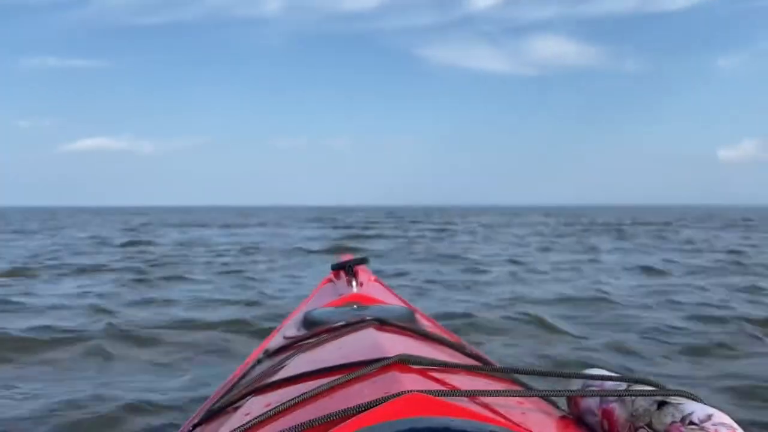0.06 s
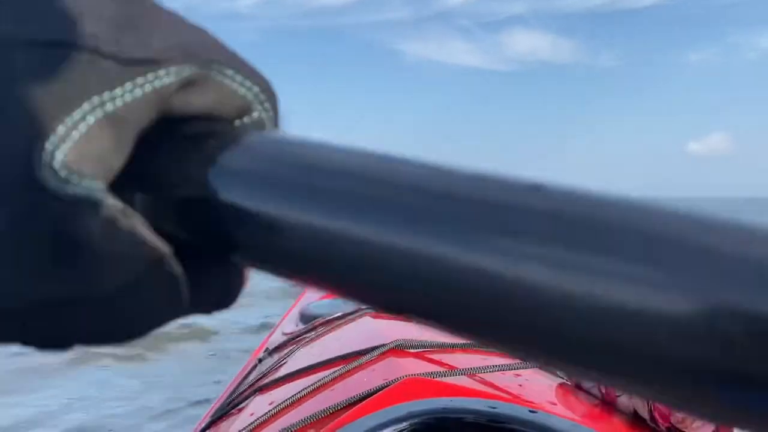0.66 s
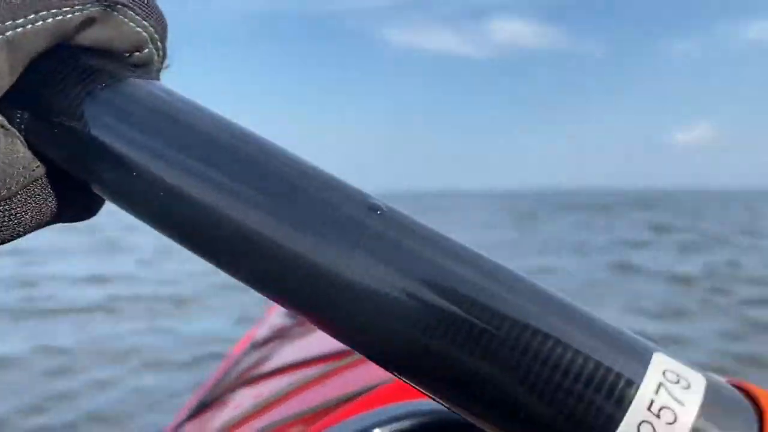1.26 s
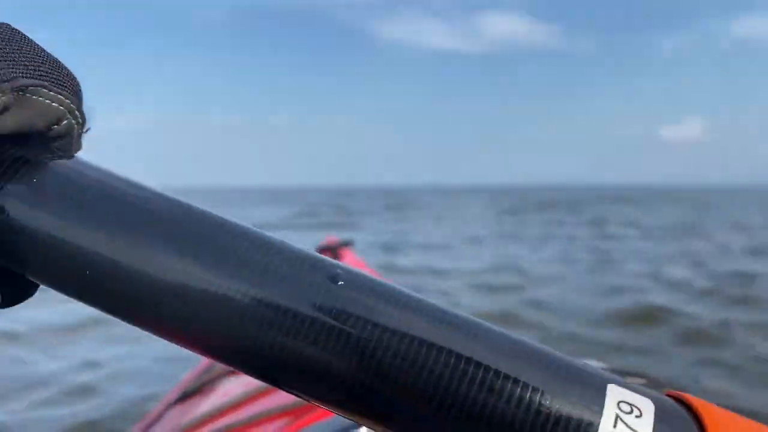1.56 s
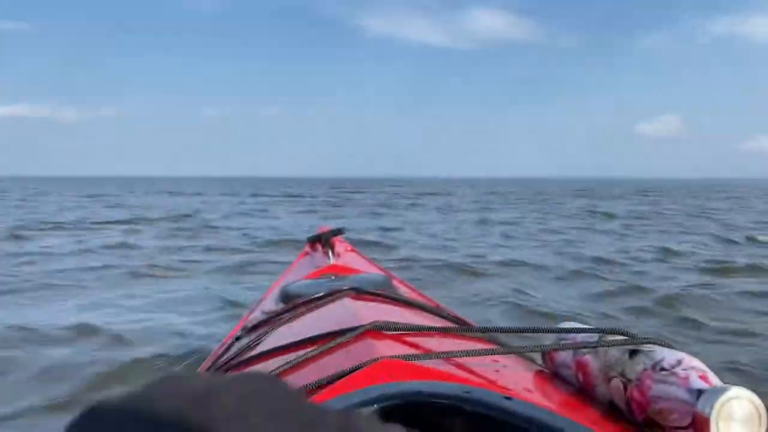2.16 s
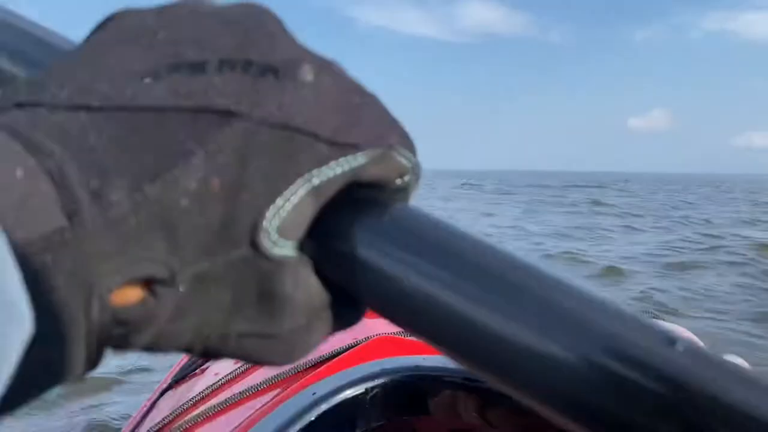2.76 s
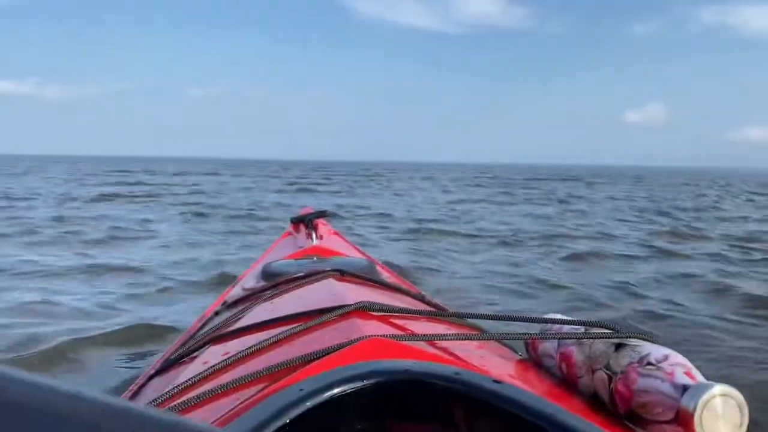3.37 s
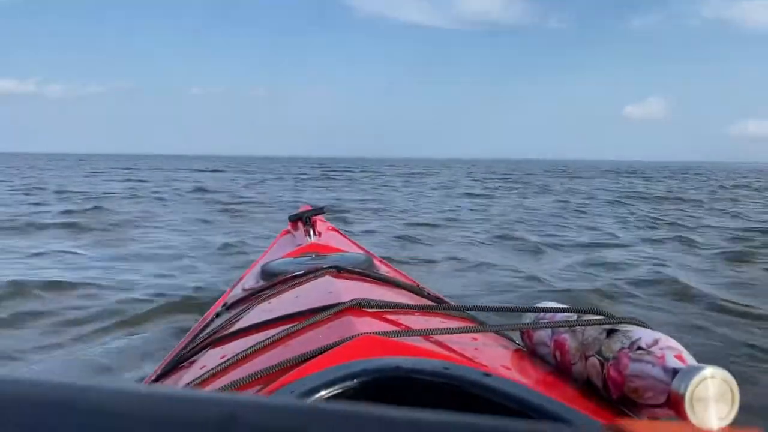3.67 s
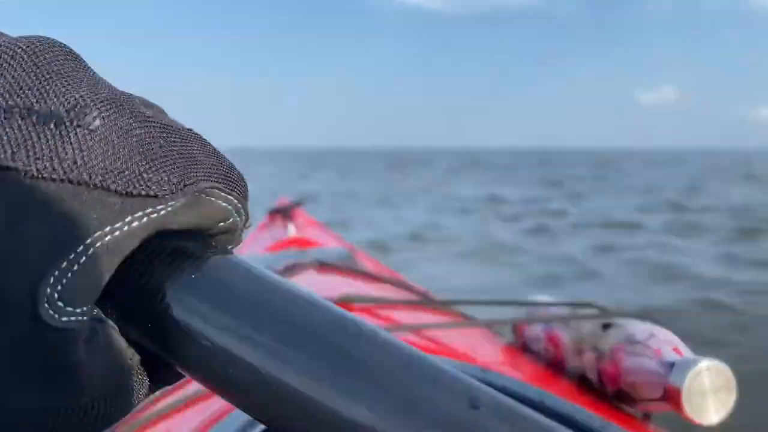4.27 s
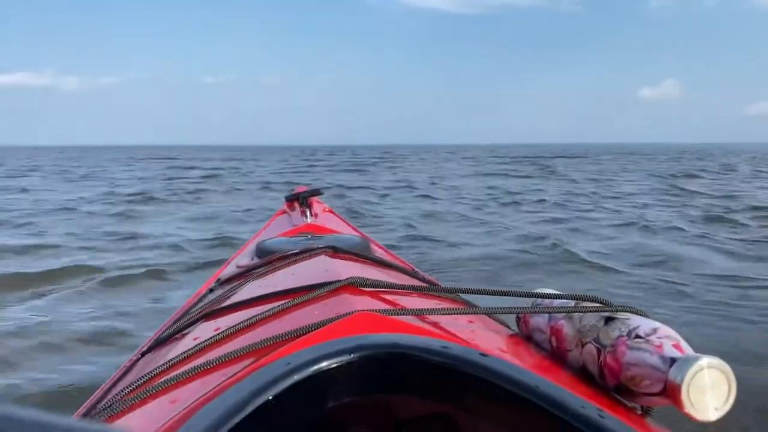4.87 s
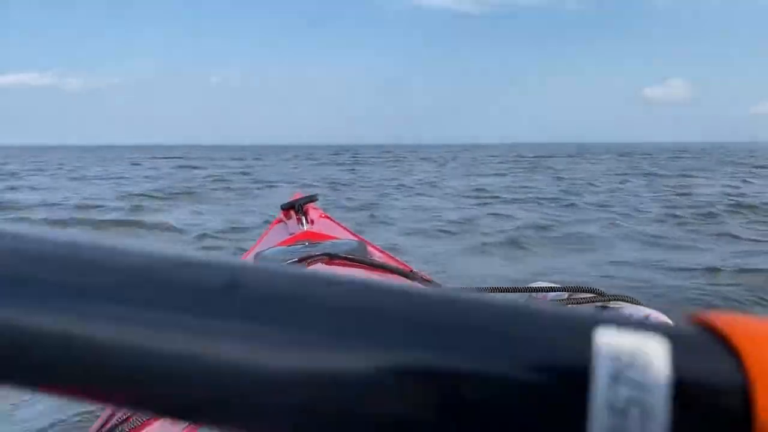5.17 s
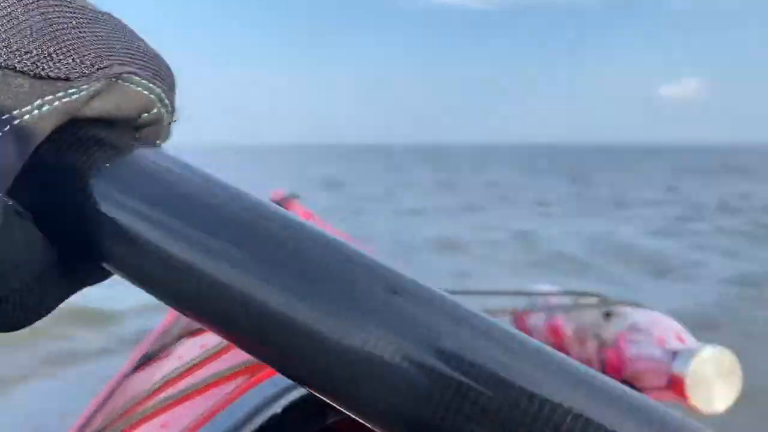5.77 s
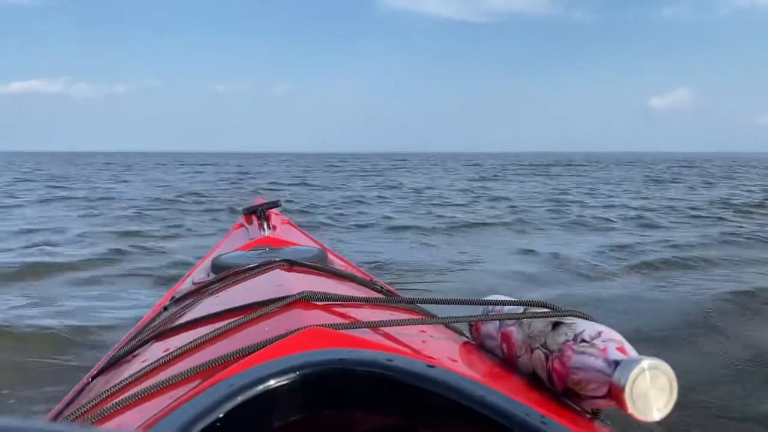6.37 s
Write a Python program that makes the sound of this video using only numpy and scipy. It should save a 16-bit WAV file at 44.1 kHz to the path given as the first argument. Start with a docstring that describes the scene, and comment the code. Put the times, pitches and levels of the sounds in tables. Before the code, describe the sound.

Wind rumbles and flutters directly on the microphone for the whole six and a half seconds, broken by sudden dull buffets. The hardest hit at about 0.8, 1.7, 3.8, 5.7 and 6 seconds. Under the wind, a kayak paddle pulls through the water close by, at the very start and near 1.4, 3.1, 4.6 and 6 seconds. Each stroke is a bubbly, splashing wash that holds for up to half a second and fizzes out. Between strokes, wavelets lap along the hull, and small, sharp slaps of water are scattered throughout, the clearest near 4.4 seconds. Drips plink into the water, with one lower, louder plink around 3.4 seconds, and a few drops tick on the hard deck, mostly between 3 and 4 seconds. Behind everything lies the faint, even hiss of choppy open water.

```python
"""Wind rumbles and flutters on the microphone, with sharp buffets, each in a swirl of rough air.
The place is a kayak on choppy open water; the two microphone ports sit on the paddler's chest.
Close by, a paddle stroke about every second and a half stirs up a wash of bubbles. Wavelets lap and slap
the hull, and drips plink into the water and tick on the deck. Farther off, the chop is an even hiss."""
import sys
import numpy as np
from scipy import signal
from scipy.fft import rfft, irfft
from scipy.io import wavfile

SR = 44100
rng = np.random.default_rng(int(sys.argv[2]) if len(sys.argv) > 2 else 0)


def wav_out(sig):
    """Save sig, one row per channel (or a flat mono array), as 16-bit PCM at SR to the path in sys.argv[1]."""
    wavfile.write(sys.argv[1], SR, np.round(np.clip(np.atleast_2d(sig).T, -1, 1) * 32767).astype(np.int16))


N = 287794
TIME, FREQ = np.arange(N) / SR, np.fft.rfftfreq(N, 1 / SR) + 1e-3

# Single strong eddies that hit the ports. Each row: time in seconds, level in dB, centre in Hz,
# width in natural-log units of frequency (a wide one is a hard crack).
STRONG_EDDIES = [(0.424, -13, 59.4, 0.51), (0.521, -13, 335, 0.76), (0.533, -10, 360, 0.58),
                 (0.611, -12, 323, .65), (0.722, -15.5, 374, 0.54), (0.8042, -8, 425, 0.65),
                 (1.298, -18, 80, 0.63), (1.5151, -12, 412, 0.48), (1.544, -12, 338, 0.77),
                 (1.59, -14, 256, 0.6), (1.7022, -6, 354, .85), (1.841, -13, 189, 0.7),
                 (1.988, -11, 225, 0.53), (2.176, -9, 334, 0.53), (2.315, -15.5, 442, 0.52),
                 (2.477, -10.5, 80, .55), (2.494, -10, 116, 0.35), (2.497, -10.5, 382, 0.44),
                 (2.845, -15, 324, 0.53), (2.877, -13.5, 524, 0.44), (2.922, -10.5, 74, 0.84),
                 (3.164, -12.5, 253, 0.37), (3.262, -13.5, 320, 0.58), (3.276, -15, 335, 0.45),
                 (3.689, -14, 397, .75), (3.698, -8, 156, 0.45), (3.746, -26, 330, 0.41),
                 (3.8027, -13.5, 470, 0.56), (3.812, -16.5, 470, 0.72), (3.832, -6.5, 185, 0.71),
                 (3.972, -15.5, 260, 0.5), (4.181, -18, 410, 0.45), (4.273, -17, 263, 0.67),
                 (4.398, -14.5, 193, 0.71), (4.514, -17, 467, 0.45), (4.581, -13, 272, 0.64),
                 (4.802, -12.5, 410, 0.68), (4.809, -12.5, 82.5, 0.51), (4.815, -14, 398, 0.68),
                 (5.198, -14, 107, 0.58), (5.353, -16.5, 251, 0.6), (5.539, -12, 312, 0.49),
                 (5.611, -10, 200, 0.49), (5.640, -9.5, 333, 0.55), (5.6546, -4.5, 283, 0.73),
                 (5.712, -11, 94, 0.61), (5.7383, -5, 335, 0.6), (5.799, -11.5, 470, 0.59),
                 (5.821, -9.5, 427, 0.59), (5.83, -11, 64.5, 0.57), (6.013, -14.5, 450, 0.54),
                 (6.014, -6, 114, 0.49), (6.3173, -13, 350, 0.53), (6.323, -12, 150, 0.7),
                 (6.4219, -8, 480, 0.55)]
# The colour of splashing water. Each row: frequency in Hz, gain in dB.
SPLASH_COLOUR = [(150, -1), (400, 13), (1200, 18), (2000, 4.5), (2800, 2.5), (4200, -0.5), (5300, -4),
                 (6600, -10.5), (8500, -9), (10300, -13.5), (12200, -30.5), (15000, -12)]


def wind(level_db=-1.5, flutter_db=7, flutter_db_per_octave=1.45, lag_cycles=0.5736, swirl_low_hz=60):
    """Turbulence right on the microphone: small eddies come in bursts and grow fastest with a gust."""
    # The wind's strength at the ports. Each row: time in seconds, level in dB.
    strength = [(0.0, -29.5), (0.27, -31.5), (0.57, -21.5), (0.93, -28), (0.96, -23.0), (1.17, -30.5),
                (1.38, -30.5), (1.53, -20.5), (1.65, -24.5), (2.39, -21), (2.72, -27.5), (3.35, -27),
                (3.53, -33.0), (3.68, -18.5), (4.04, -21.5), (4.1, -33), (4.25, -21), (4.34, -36),
                (4.52, -28), (4.76, -25.5), (4.82, -17.5), (5.03, -32), (5.21, -23.5), (5.27, -41),
                (5.33, -24.5), (5.48, -29), (5.66, -20.5), (5.69, -35.5), (5.81, -28), (5.96, -28.5),
                (6.08, -20.5), (6.11, -36.5), (6.17, -23), (6.26, -44.5), (6.41, -22), (6.53, -26)]
    # The wind's share in each half octave. Each row: frequency in Hz, relative level in dB.
    band_levels = [(32, -37), (45, -11.5), (65, -4), (130, -8), (260, -8.5), (500, -10.5), (720, -16),
                   (1000, -25.5), (1400, -35), (2000, -49.5)]
    breeze_db = curve(strength)
    gust_db = breeze_db - breeze_db.mean()
    bursts = wander(rate_hz=35)
    spectrum = np.zeros((2, len(FREQ)), complex)
    for hz in 32 * 2 ** (np.arange(13) / 2):
        follow = 0.34 + 0.33 * max(np.log2(hz / 100), 0)
        swell = amp(level_db + read(band_levels, hz) + breeze_db.mean() + follow * gust_db)
        flutter = 2 * np.tanh((0.69 * bursts + 0.5 * wander(rate_hz=20)) / 2)
        depth_db = max(flutter_db + flutter_db_per_octave * np.log2(hz / 400), 0)
        air = pair(rng.standard_normal((2, N)), likeness=0.6) * amp(depth_db * flutter)
        band = np.cos(np.pi / 2 * np.clip(2 * np.log2(FREQ / hz), -1, 1))
        trail = np.exp(-2j * np.pi * lag_cycles * np.log(FREQ))  # large eddies trail small ones
        eddies = unit(shaped(air, band * trail))
        power = swell ** 2 + swirl_power(hz) / (1 + (swirl_low_hz / hz) ** 6)
        spectrum += rfft(eddies * np.sqrt(power))
    return irfft(spectrum, N)


def buffets(lag_cycles=0.79, skew_rad=0.74, wake=0.28, wake_s=0.00311, high_hz=1600, low_hz=42):
    """An eddy hits the ports as a pressure swing that falls in pitch: a crack, then a thump."""
    size = 8192
    f, out = np.fft.rfftfreq(size, 1 / SR) + 1e-3, np.zeros((2, N))
    for s, db, hz, width in STRONG_EDDIES:
        turn, slant, wait = 2 * rng.random(3) - 1
        log_ratio = np.log(f / hz)
        swing = np.exp(-0.5 * (log_ratio / width) ** 2 - 2j * np.pi * lag_cycles * log_ratio)
        swing *= 1 + wake * np.exp(-2j * np.pi * f * wake_s * 2 ** (wait / 2))  # a weaker eddy follows
        ports = np.exp(1j * (np.pi * turn + skew_rad * slant * np.array([[1], [-1]])))
        wave = np.fft.fftshift(irfft(swing * ports), axes=1)
        add(out, s - size / 2 / SR, wave * amp(db) / abs(wave).max())
    overloaded = np.tanh(out)  # the hardest buffets overload softly, gaining harmonics that the ports then cut above the treble
    return shaped(overloaded, 1 / np.sqrt(1 + (FREQ / high_hz) ** 7 + (low_hz / FREQ) ** 10))


def swirl_power(hz, level_db=-23.5, lag_s=0.018, width_s=0.012, octaves_below=0.69):
    """Power around hz of the larger eddies a buffet leaves, just behind it and lower in pitch."""
    s, db, centre_hz, _ = np.transpose(STRONG_EDDIES)
    t = TIME[::100]
    share = amp(db + level_db) ** 2 * np.exp(-(np.log2(hz / centre_hz) + octaves_below) ** 2)
    swells = np.exp(-((t - s[:, None] - lag_s) / width_s) ** 2)
    return np.interp(TIME, t, share @ swells)


def wash(level_db=-2.5, bubbles_per_s=3000, size_db=4.5, spray_db=1, clump_db=2):
    """Beside the boat, stirred water breeds bubbles of like size in spurts, under a fine spray."""
    swarm, pitches = np.zeros((2, N)), 60
    births = int(bubbles_per_s * N / SR / pitches)
    for register in np.geomspace(500, 15000, pitches).reshape(6, -1):
        spurts = np.sqrt(0.53 + patter(per_s=70, decay_s=0.011) ** 2)
        for k, hz in enumerate(register):
            clicks = np.zeros(N)
            clicks[rng.integers(0, N, births)] = amp(size_db * np.minimum(rng.exponential(1, births), 4))
            cycles = rng.uniform(3, 9) * (hz / 2000) ** (1 / 3)
            ring = bubble(hz, cycles, rise=rng.uniform(-0.003, 0.006))
            swarm[k % 2] += unit(signal.oaconvolve(clicks * spurts, ring)[:N]) * np.sqrt(hz)
    swarm = np.array([swarm[0] + swarm[1], swarm[0] - swarm[1]])  # bubbles lie a little to either side
    spray = rng.standard_normal((2, N)) * patter(per_s=1400, decay_s=0.0026)
    spray *= np.sqrt(1.4 + patter(per_s=90, decay_s=0.0037) ** 2)
    spray = unit(shaped(spray, FREQ / (FREQ + 2500)))
    water = (unit(swarm) + amp(spray_db) * spray) * amp(clump_db * wander(rate_hz=4.8))
    water = shaped(water, amp(read(SPLASH_COLOUR, FREQ)))
    water /= np.std(shaped(water, FREQ > 2500))  # the treble sets the level
    return from_water(water, likeness=0.75) * amp(level_db) * stirring()


def stirring(bite_s=0.11, fizz_out_db_per_s=51):
    """How hard the water is stirred: a stroke bites, holds and fizzes out; a wavelet swells and sinks."""
    # Paddle strokes. Each row: blade entry in seconds, length of the pull in seconds, level in dB.
    pulls = [(-0.05, 0.41, -48), (1.371, 0.4, -47.5), (3.139, 0.53, -46.5), (4.551, 0.2, -45),
             (6.0, 0.44, -47)]
    # Wavelets lapping along the hull. Each row: crest in seconds, half length in seconds, level in dB.
    wavelets = [(0.747, 0.11, -70), (1.133, 0.21, -59.5), (1.97, 0.076, -52.5), (2.412, 0.055, -63.5),
                (2.66, 0.11, -58), (3.097, 0.1, -58.5), (4.39, 0.3, -54), (4.983, 0.043, -47),
                (5.238, 0.12, -54.5), (5.508, 0.06, -52.5), (5.719, 0.065, -51), (6, 0.083, -51.5)]
    swells = []
    for s, pull_s, db in pulls:
        bite = np.clip((TIME - s) / bite_s, 0, 1)
        swells.append(bite * amp(db - fizz_out_db_per_s * np.maximum(TIME - s - pull_s, 0)))
    swells += [amp(db) * np.exp(-0.5 * ((TIME - s) / half_s) ** 2) for s, half_s, db in wavelets]
    return np.linalg.norm(swells, axis=0)


def slaps(level_db=1, attack_s=0.00041, decay_s=0.012, grain_db=5, pocket_db=14, pocket_q=7):
    """A sheet of water breaks on hull or blade: a short, grainy burst that rings a pocket of air."""
    # Slaps and spits close by. Each row: start in seconds, level in dB, pitch of the air pocket in Hz.
    hits = [(0.113, -33, 4460), (0.2488, -32.5, 2400), (0.327, -29.5, 2420), (0.81, -43.5, 3200),
            (1.013, -48, 5830), (1.064, -46, 3550), (1.152, -44.5, 5900), (1.158, -33, 2450),
            (1.247, -37, 2850), (1.3783, -28, 2970), (1.4315, -35, 2340), (1.536, -35, 5430),
            (1.646, -31, 5150), (1.656, -28, 2480), (1.765, -30, 5050), (2.592, -34.5, 2450),
            (3.1738, -31.5, 3370), (3.2466, -32, 2390), (3.376, -35, 3530), (3.962, -34.5, 2920),
            (4.126, -31, 3350), (4.29, -31, 5500), (4.304, -28.5, 2440), (4.393, -20.5, 1890),
            (4.658, -43, 5300), (4.691, -33, 5160), (4.756, -35, 5150), (4.801, -27, 2130),
            (5.716, -39, 5300), (6.045, -25.5, 1890), (6.287, -29.5, 4500), (6.296, -29.5, 2600),
            (6.4205, -28.5, 2270)]
    t, out = np.arange(SR // 8) / SR, np.zeros((2, N))
    envelope = (1 - np.exp(-t / attack_s)) * np.exp(-t / decay_s)
    grains = rng.standard_normal((2, N)) * amp(grain_db * wander(rate_hz=290))
    grains = unit(shaped(grains, amp(read(SPLASH_COLOUR, FREQ))))
    for s, db, hz in hits:
        burst = grains[:, round(s * SR):][:, :len(t)]
        burst = burst * envelope[:burst.shape[1]]
        pocket = amp(pocket_db) * signal.lfilter(*signal.iirpeak(hz, pocket_q, SR), burst)
        slap = signal.lfilter(*signal.butter(2, hz / 2, "high", fs=SR), burst + pocket)
        add(out, s, slap * amp(db + level_db) / abs(slap).max())
    return from_water(out, likeness=0.53)


def drips(cycles=10, rise=0.004, split_db=-7, split_within_s=0.00272):
    """Drips off the blade trap large bubbles that plink; a smaller one splits off just after."""
    # Ringing bubbles. Each row: start in seconds, level in dB, pitch in Hz.
    plinks = [(1.002, -36, 2320), (1.088, -35, 2540), (1.203, -42, 2280), (1.478, -28, 2800),
              (1.494, -29.5, 5350), (1.775, -30, 5220), (2.064, -38.5, 3170), (2.137, -39, 1750),
              (3.074, -44, 2500), (3.093, -40.5, 2400), (3.381, -27, 3180), (3.412, -17.5, 1074),
              (3.421, -27, 1240), (4.402, -33, 1930), (4.587, -26.5, 2120), (4.724, -28, 1990),
              (6.033, -28.5, 1920), (6.273, -32, 2050)]
    out = np.zeros((2, N))
    for s, db, hz in plinks:
        wait, smaller = rng.random(2)
        add(out[0], s, amp(db) * bubble(hz, cycles, rise))
        small_bubble = bubble(hz * (1 + 0.6 * smaller), cycles / 2, rise)
        add(out[0], s + split_within_s * wait, amp(db + split_db) * small_bubble)
    return from_water(out, likeness=0.89)


def deck_ticks(level_db=-3, decay_s=0.0013, low_cut_hz=4500):
    """Drops burst on the hard deck, near the microphone."""
    # Drops landing. Each row: start in seconds, level in dB.
    drops = [(0.2813, -28.5), (0.4494, -35), (1.1987, -38), (2.579, -38), (3.217, -31), (3.3648, -32),
             (3.486, -27), (3.626, -32), (3.9593, -30), (5.22, -39), (6.048, -34)]
    t, out = np.arange(SR // 50) / SR, np.zeros((2, N))
    for s, db in drops:
        add(out, s, amp(db + level_db) * rng.standard_normal((2, len(t))) * np.exp(-t / decay_s))
    return from_water(shaped(out, 1 / (1 + low_cut_hz / (1j * FREQ))), likeness=0.82)


def distant_chop(level_db=-67, trickle_db=-3):
    """The even hiss of chop far across the bay, with a fine trickle of ripples close by."""
    # The colour of open water. Each row: frequency in Hz, gain in dB.
    hiss_colour = [(200, -14.5), (1500, 0.5), (2500, -0.5), (6000, -1), (9000, -5), (12500, -10.5),
                   (15000, -9)]
    fizz = rng.standard_normal((2, N)) * np.hypot(1, amp(trickle_db) * patter(per_s=160, decay_s=0.0015))
    hiss = shaped(fizz, amp(read(hiss_colour, FREQ)))
    return amp(level_db) * unit(from_water(hiss, likeness=0.54))


def bubble(hz, cycles, rise):
    """An air pocket rings down over the given cycles; a positive rise lifts its pitch as it surfaces."""
    age = np.arange(int(6 * cycles / hz * SR) + 8) * hz / SR / cycles
    tone = np.sin(2 * np.pi * cycles * age * (1 + rise * age))
    return tone * np.exp(-age) * (1 - np.exp(-2 * cycles * age))


def from_water(two, likeness, delay_s=0.0002885, detour_s=0.00008):
    """Water sounds reach the right port first; long waves bend round the housing and lag more."""
    return delay_left(pair(two, likeness), delay_s + detour_s / (1 + (FREQ / 6500) ** 6))


def delay_left(stereo, lag_s):
    """Sound is heard later on the left."""
    return shaped(stereo, np.exp(-2j * np.pi * np.outer([1, 0], FREQ * lag_s)))


def pair(two, likeness):
    """Blends two unrelated signals into left and right of a given likeness."""
    angle = np.arccos(np.clip(likeness, 0, 1)) / 2
    return np.array([np.cos(angle) * two[0] + side * np.sin(angle) * two[1] for side in (1, -1)])


def patter(per_s, decay_s):
    """An envelope of random bursts that start sharply and die away, rms 1."""
    landings = (rng.random(N) < per_s / SR) * rng.exponential(1, N)
    return unit(signal.lfilter([1], [1, -np.exp(-1 / (decay_s * SR))], landings))


def wander(rate_hz):
    """Random drift of rms 1 that rolls off above the given rate."""
    return unit(shaped(rng.standard_normal(N), FREQ / (FREQ + 6) / (1 + (FREQ / rate_hz) ** 2)))


def amp(db):
    """Decibels to gain."""
    return 10 ** (np.asarray(db) / 20)


def unit(x):
    """Scales to an rms of 1."""
    return x / np.sqrt(np.mean(x ** 2) + 1e-20)


def curve(rows):
    """A time table at every sample."""
    return np.interp(TIME, *np.transpose(rows))


def read(points, hz):
    """A spectrum table's value at hz, on a log-frequency axis."""
    f, value = np.transpose(points)
    return np.interp(np.log(hz), np.log(f), value)


def shaped(x, response):
    """Filters by a frequency response."""
    return irfft(rfft(x) * response, N)


def add(mix, s, sound):
    """Adds a sound into the mix at time s."""
    part = mix[..., max(round(s * SR), 0):][..., :sound.shape[-1]]
    part += sound[..., :part.shape[-1]]


def scene(left_lag_s=0.0002):
    """The wind's rumble and buffets, heard slightly earlier on the right, over water near and far."""
    air = delay_left(wind() + buffets(), left_lag_s)
    return air + wash() + slaps() + drips() + deck_ticks() + distant_chop()


def record(dry, edge_hz=15700):
    """The recorder's band limit cuts the highest treble."""
    low_pass = signal.firwin(511, edge_hz, window=("kaiser", 9), fs=SR)
    return signal.oaconvolve(dry, low_pass[None], "same")


dry = scene()
out = record(dry)
wav_out(out)
```